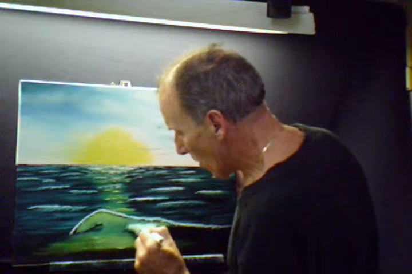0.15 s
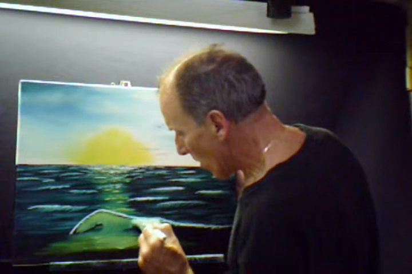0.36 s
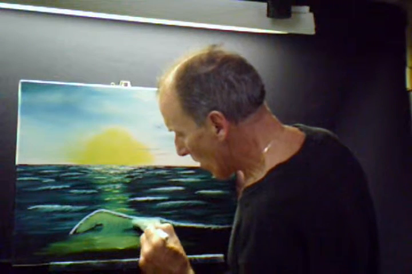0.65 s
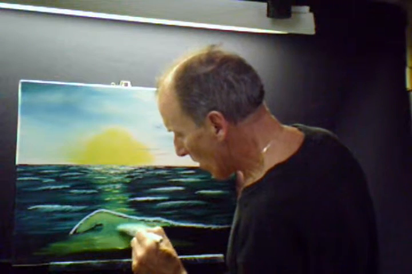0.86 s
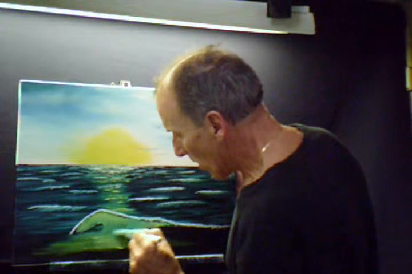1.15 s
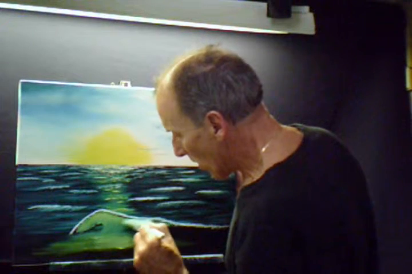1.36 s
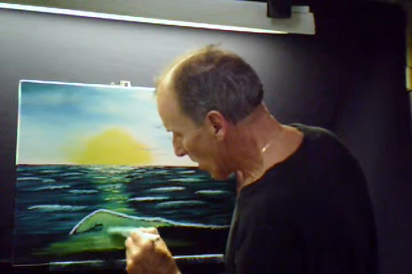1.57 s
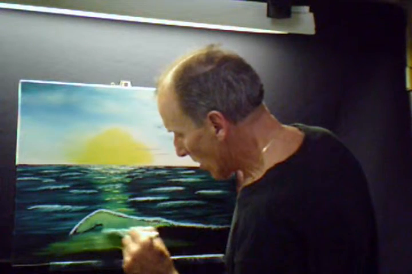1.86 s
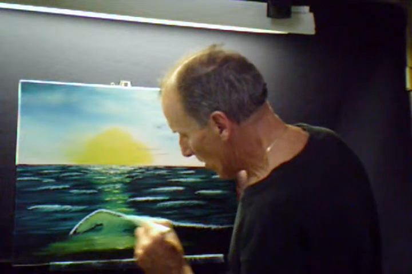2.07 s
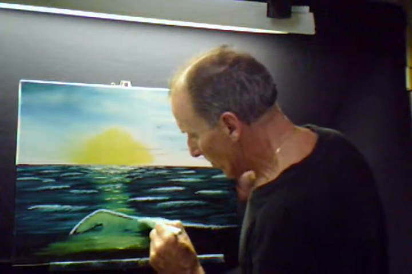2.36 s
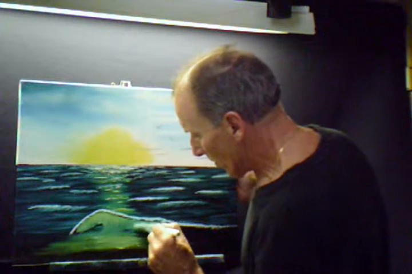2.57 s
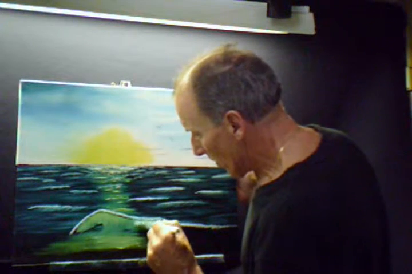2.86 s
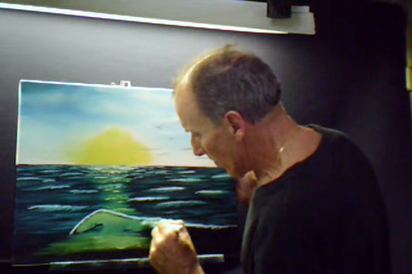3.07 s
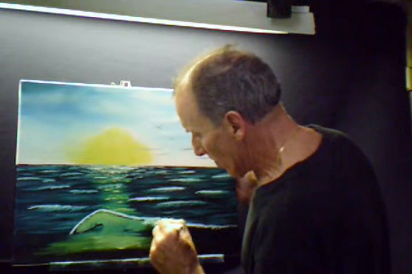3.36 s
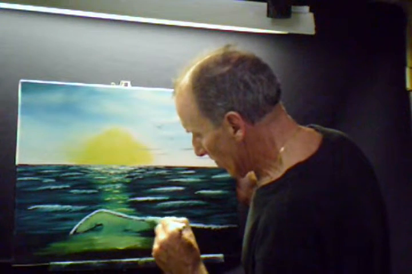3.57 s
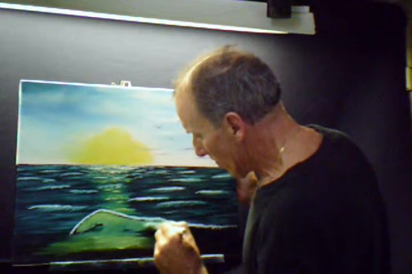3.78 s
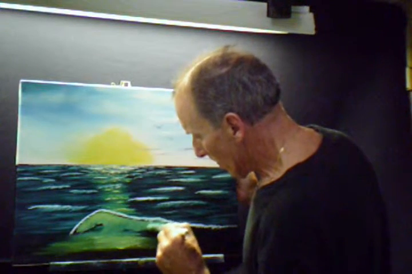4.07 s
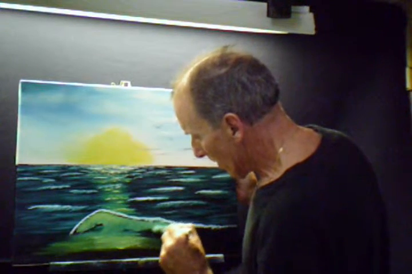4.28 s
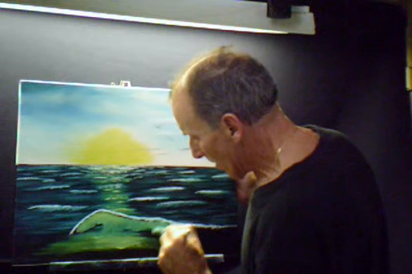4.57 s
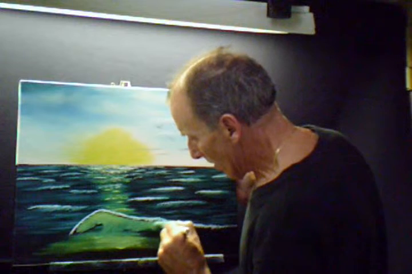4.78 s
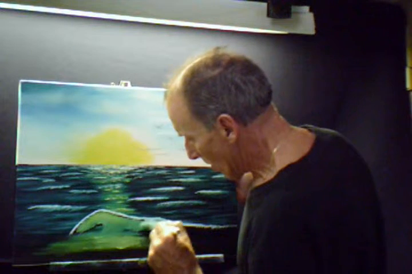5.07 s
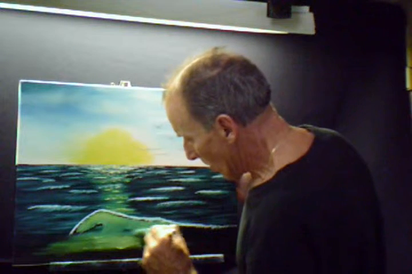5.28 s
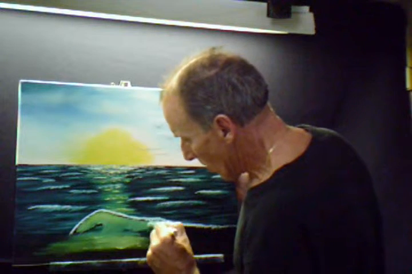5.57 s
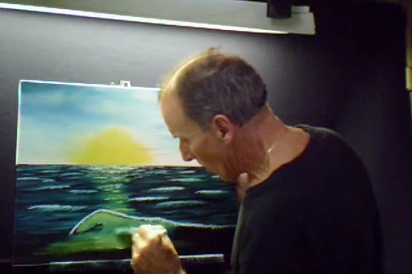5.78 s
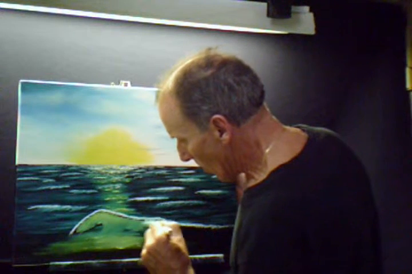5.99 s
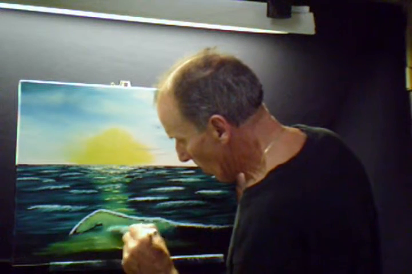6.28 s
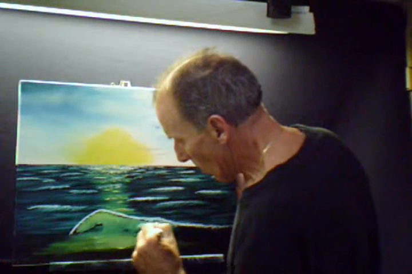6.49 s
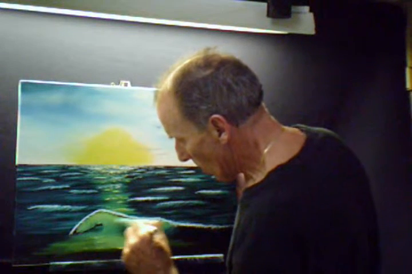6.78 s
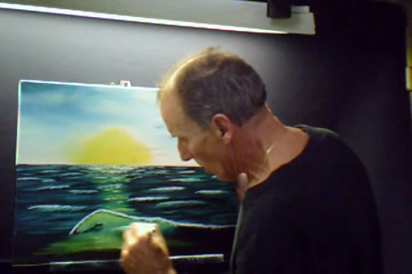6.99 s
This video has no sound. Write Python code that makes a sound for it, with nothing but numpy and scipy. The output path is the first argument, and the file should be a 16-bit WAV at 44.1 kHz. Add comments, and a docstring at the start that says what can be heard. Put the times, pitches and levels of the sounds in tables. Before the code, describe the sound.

Quick, uneven soft thuds and light scuffs, like a brush dabbing canvas, swell and drop over a noisy microphone's rumble and hiss.

```python
"""Dull thumps limp along on a clock of about ten beats a second, most likely electrical pulses in a
noisy microphone line during quiet painting at a canvas. Each has a soft scuff and a faint trailing chirp.
Thumps, scuffs and rumble creep up in level, then snap to a new one with a click.
Behind them, a 20 Hz gate flutters the hiss and chops a thin whine and tiny ticks."""
import sys
import numpy as np
from scipy import signal
from scipy.fft import rfft, irfft
from scipy.io import wavfile
from scipy.ndimage import uniform_filter1d

SR = 44100
rng = np.random.default_rng(int(sys.argv[2]) if len(sys.argv) > 2 else 0)


def wav_out(sig):
    """Save sig, one row per channel (or a flat mono array), as 16-bit PCM at SR to the path in sys.argv[1]."""
    wavfile.write(sys.argv[1], SR, np.round(np.clip(np.atleast_2d(sig).T, -1, 1) * 32767).astype(np.int16))


N = 315182
T = np.arange(N) / SR

# pulse cycle, long-short-short: length/s, level/dB before filters and swell
PULSE_CYCLE = [(.0131, 4.5), (0.00958, 2.5), (0.0103, 2.5)]
# gain snaps: t/s, level/dB jumped to
GAIN_SNAPS = [(0.2336, -8), (1.1394, -17), (2.2424, -6.5), (3.8562, -15), (5.1335, -1.5), (5.4699, -15),
              (6.5729, -7.5)]
# rumble spectrum: f/Hz, relative level/dB
RUMBLE_SPECTRUM = [(8, -1.5), (20, 3), (42, 2), (62, -14), (87, -7.5), (115, -16.5), (220, -24), (450, -31),
                   (900, -38), (1800, -42.5), (4000, -45.5), (9500, -45.5), (12500, -60)]
# hiss spectrum: f/Hz, relative level/dB
HISS_SPECTRUM = [(200, 9), (1500, 0), (4000, -2), (9600, -3.5), (11000, -10), (12500, -7), (13500, -34)]
# whine tones: f/Hz, rms level/dB before gate and low-pass
WHINE_TONES = [(4200, -68), (5781, -76), (6200, -72), (7400, -82), (9600, -66), (12450, -73)]


def thumps(rise_s=.0012, round_hz=22, sag_hz=6, drift_hz=1):
    """Square pulses rounded into thuds; the coupling swings each slowly back past rest."""
    pulses = np.zeros(N)
    for start_s, length_s, db in pulse_plan():
        on = slice(max(int(start_s * SR), 0), int((start_s + length_s) * SR))
        pulses[on] -= undb(db) * np.clip((T[on] - start_s) / rise_s, 0, 1)
    rounded = pole(pulses, round_hz, "low")
    return pole(pole(rounded, sag_hz, "high"), drift_hz, "high")


def pulse_plan(clock_hz=9.9324, first_beat_s=-.0023, spacing_beats=1.808, early_beats=.45):
    """Pulses fall due evenly but wait for the next beat, hence the limp. Rows: t/s, length/s, level/dB."""
    plan = []
    for turn in range(int(N / SR * clock_hz / spacing_beats) + 1):
        beat = np.ceil(turn * spacing_beats - early_beats)
        length_s, db = PULSE_CYCLE[turn % len(PULSE_CYCLE)]
        plan.append((first_beat_s + beat / clock_hz - length_s / 2, length_s, db))
    return plan


def scuffs(delay_s=.008, sigma_s=.022, gain_db=-47):
    """Soft mid-range puff around each thump."""
    envelope = sum(bell(start_s + delay_s, sigma_s) for start_s, _, _ in pulse_plan())
    return undb(gain_db) * envelope * noise([(150, -24), (400, 10), (900, 0), (2500, -5), (8000, -14)])


def chirps(delay_s=.037, sigma_s=.011, centre_hz=6400, slide_hz=1700, rasp_hz=450, gain_db=-55):
    """Thin tone after each thump, sliding fast and at random through the treble."""
    slide = noise([(20, 0), (40, 0), (80, -40)])
    rasp = noise([(500, 0), (2000, -30)])
    pitch_hz = centre_hz + slide_hz * slide + rasp_hz * rasp
    envelope = sum(bell(start_s + length_s / 2 + delay_s, sigma_s) for start_s, length_s, _ in pulse_plan())
    return undb(gain_db) * envelope * np.sqrt(2) * np.sin(2 * np.pi * np.cumsum(pitch_hz) / SR)


def swell(start_s=.019, start_db=-.5, ceiling_db=4, recover_s=2.99):
    """Gain recovers like a charging capacitor; each snap cuts the wave and clicks."""
    gain, ceiling = np.ones(N), undb(ceiling_db)
    for snap_s, db in [(start_s, start_db)] + GAIN_SNAPS:
        after = T >= snap_s
        gain[after] = ceiling + (undb(db) - ceiling) * np.exp((snap_s - T[after]) / recover_s)
    return gain


def rumble(gate, gain_db=-27):
    """Deep line noise with a fluttering top."""
    return undb(gain_db) * flutter(noise(RUMBLE_SPECTRUM), gate, depth_db=2.45, above_hz=560)


def hiss(gate, gain_db=-55.5):
    """Broad line noise with fluttering treble."""
    return undb(gain_db) * flutter(noise(HISS_SPECTRUM), gate, depth_db=2.5, above_hz=5300)


def whine(gate, leak=.14, fizz_hz=9650, skirt_hz=500, fizz_db=-66):
    """Chopped tones, never fully off; narrow fizz around the strongest."""
    tones = sum(np.sqrt(2) * undb(db) * np.sin(2 * np.pi * (hz * T + rng.random()))
                for hz, db in WHINE_TONES)
    fizz = noise([(fizz_hz - skirt_hz, -50), (fizz_hz, 0), (fizz_hz + skirt_hz, -50)])
    return (leak + (1 - leak) * gate) * tones + gate * undb(fizz_db) * fizz


def ticks(gate, rate_per_s=9, sigma_s=.005, scatter_db=3, gain_db=-61):
    """Tiny random spits of bright hiss, passed while the gate is open."""
    draws = rng.random((int(rate_per_s * N / SR), 2))
    envelope = sum(undb(scatter_db * (2 * size + .5)) * bell(when * N / SR, sigma_s)
                   for when, size in draws)
    return undb(gain_db) * gate * envelope * noise([(6000, -30), (9000, 4), (11000, 9), (12500, -11)])


def chopper(rate_hz=19.87, centre_s=-.0005, duty=.54):
    """Periodic gate, 0 to 1, with 2 ms edges."""
    phase = ((T - centre_s) * rate_hz + .5) % 1 - .5
    return uniform_filter1d(1. * (np.abs(phase) < duty / 2), size=90)


def flutter(x, gate, depth_db, above_hz):
    """Treble lift while the gate is open."""
    return x + (undb(depth_db) - 1) * gate * pole(x, above_hz, "high")


def noise(spectrum):
    """Unit-rms noise shaped by points: f/Hz, relative level/dB."""
    hz, db = np.transpose(spectrum)
    bins_hz = np.maximum(np.arange(N // 2 + 1) * SR / N, 1)
    shape = undb(np.interp(np.log(bins_hz), np.log(hz), db))
    x = irfft(rfft(rng.standard_normal(N)) * shape, N)
    return x / np.std(x)


def bell(centre_s, sigma_s):
    """Gaussian envelope."""
    return np.exp(-.5 * np.minimum(((T - centre_s) / sigma_s) ** 2, 60))


def pole(x, corner_hz, kind):
    """First-order low-pass or high-pass."""
    return signal.lfilter(*signal.butter(1, corner_hz, kind, fs=SR), x)


def undb(db):
    """Decibels to gain."""
    return 10 ** (np.asarray(db) / 20)


def scene():
    """Mono mix; only thumps, scuffs and rumble ride the swell."""
    gate = chopper()
    low_noise, high_noise = rumble(gate), hiss(gate)
    swelling = swell() * (thumps() + scuffs() + low_noise)
    return (swelling + high_noise + whine(gate) + chirps() + ticks(gate))[None]


def record(dry, soften_hz=11000, cutoff_hz=13400):
    """Line bandwidth: treble roll-off, then a steep cut."""
    soft = signal.sosfilt(signal.butter(4, soften_hz, fs=SR, output="sos"), dry)
    return signal.sosfilt(signal.ellip(8, .2, 70, cutoff_hz, fs=SR, output="sos"), soft)


dry = scene()
out = record(dry)
wav_out(out)
```